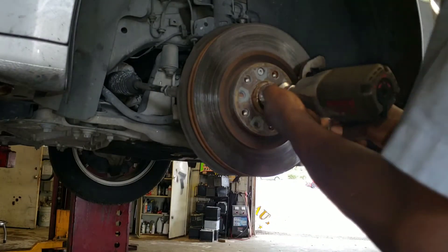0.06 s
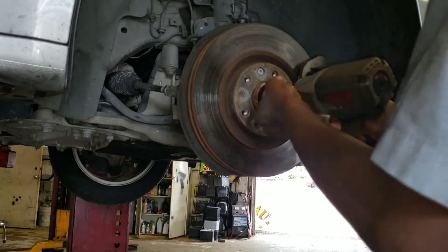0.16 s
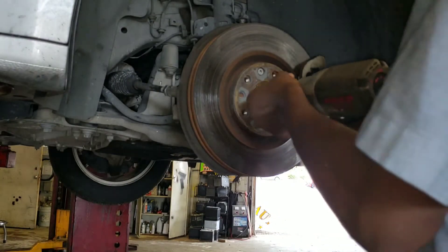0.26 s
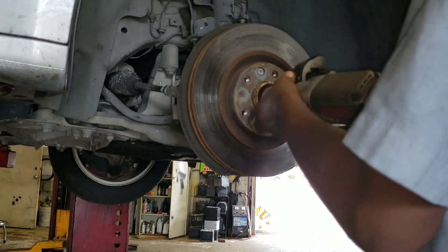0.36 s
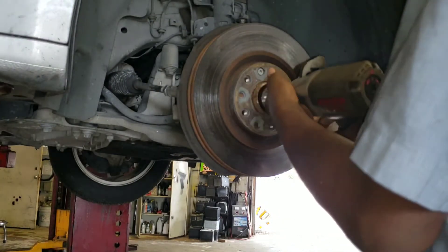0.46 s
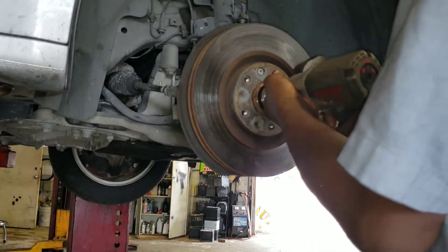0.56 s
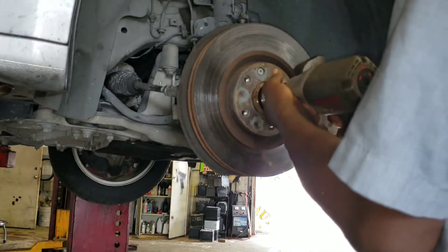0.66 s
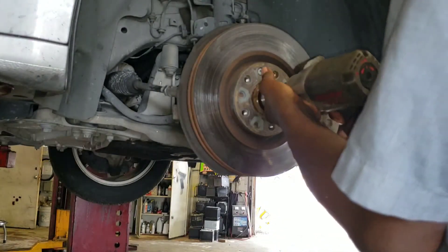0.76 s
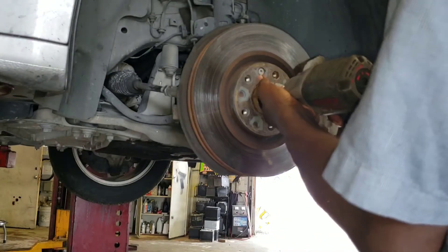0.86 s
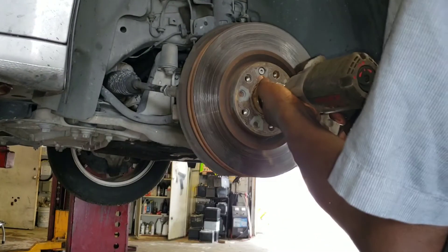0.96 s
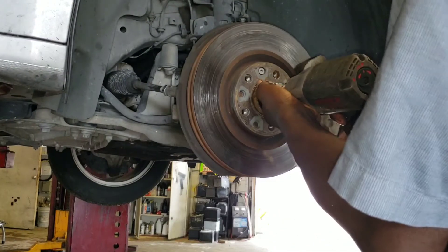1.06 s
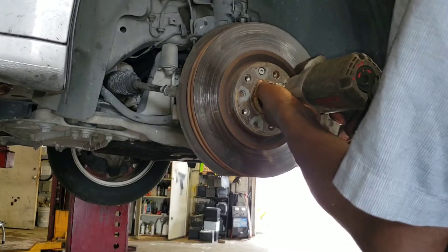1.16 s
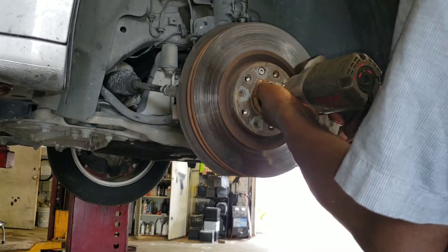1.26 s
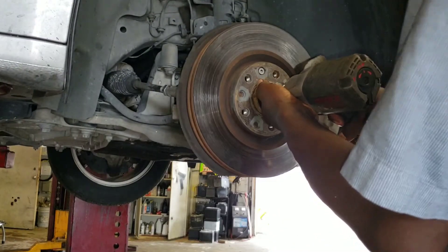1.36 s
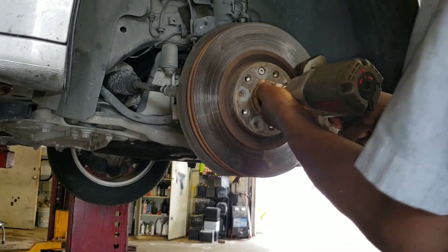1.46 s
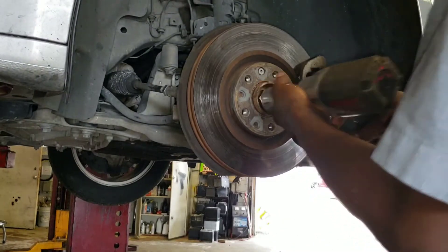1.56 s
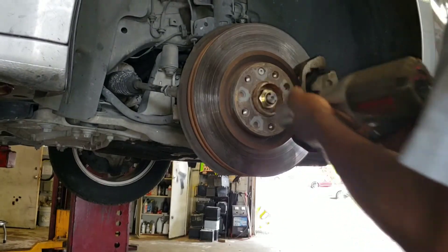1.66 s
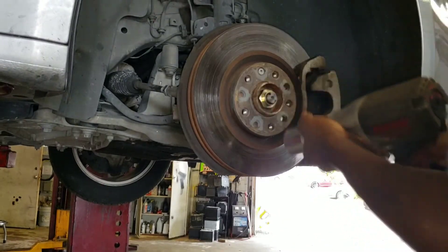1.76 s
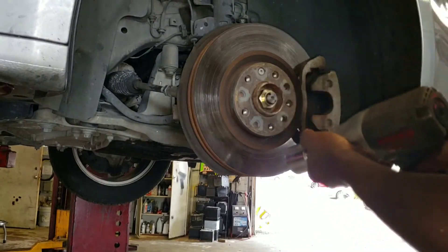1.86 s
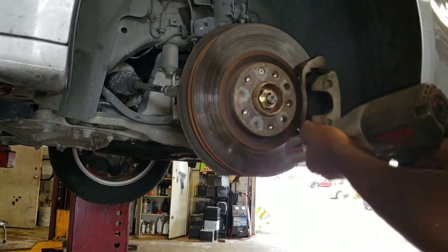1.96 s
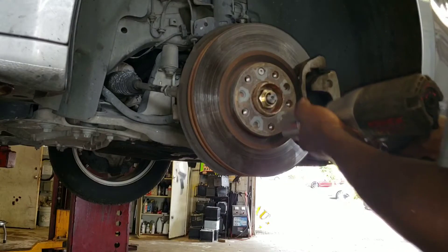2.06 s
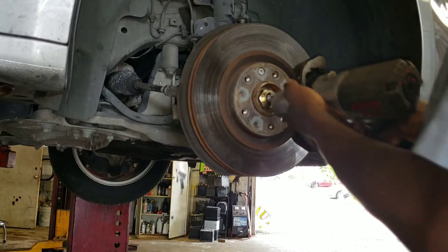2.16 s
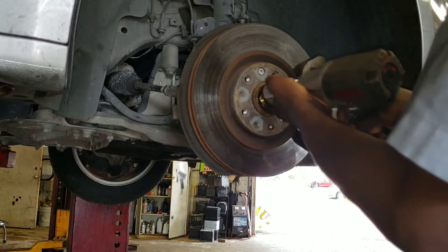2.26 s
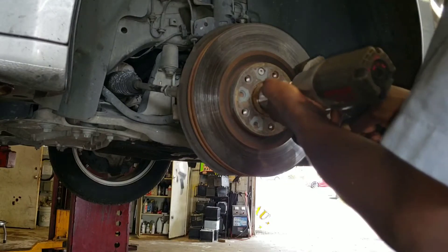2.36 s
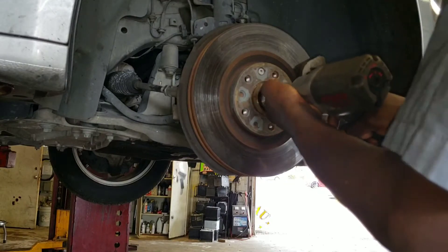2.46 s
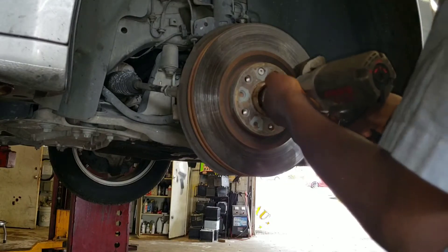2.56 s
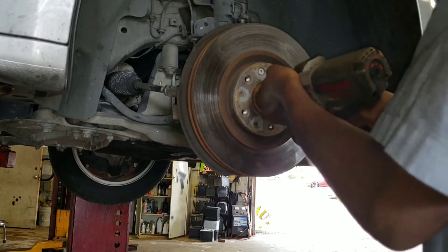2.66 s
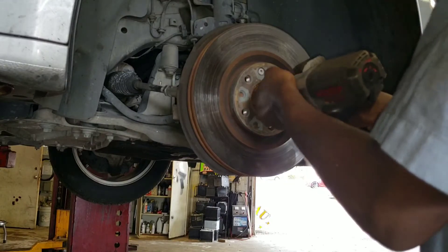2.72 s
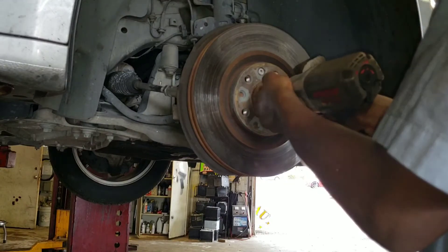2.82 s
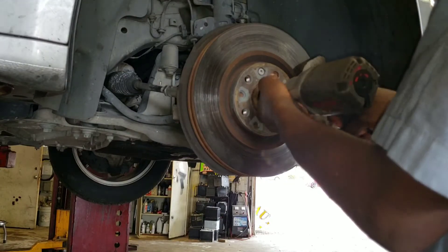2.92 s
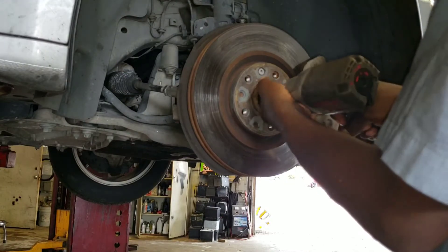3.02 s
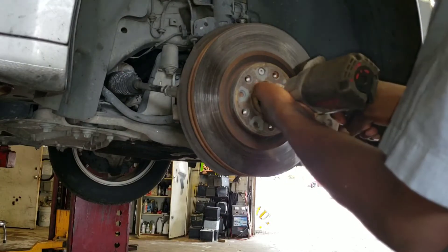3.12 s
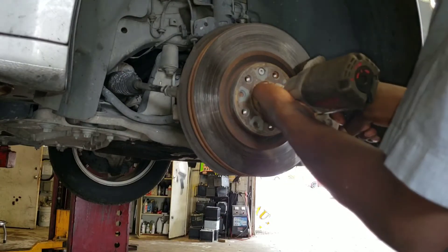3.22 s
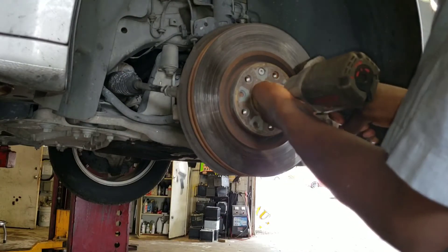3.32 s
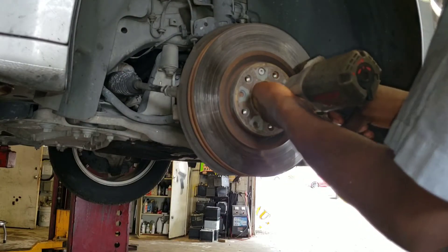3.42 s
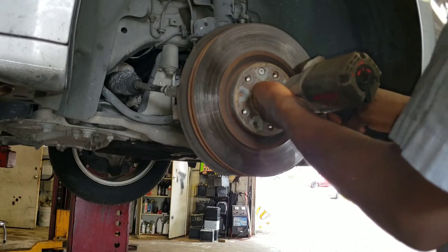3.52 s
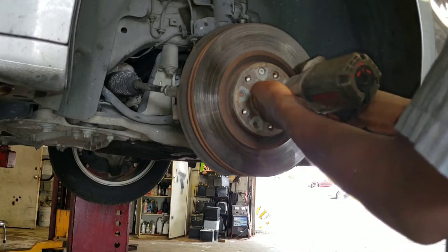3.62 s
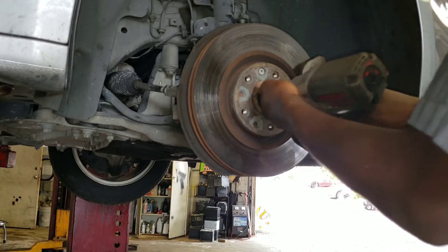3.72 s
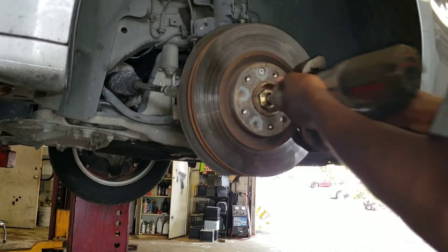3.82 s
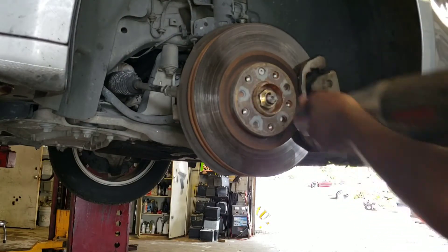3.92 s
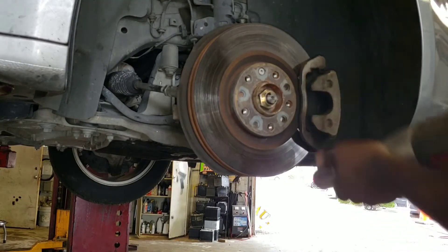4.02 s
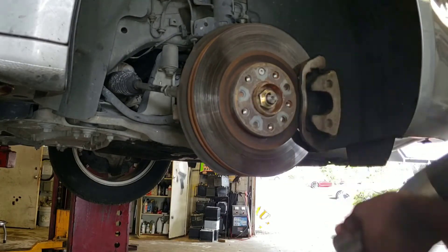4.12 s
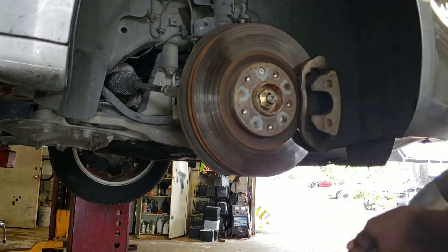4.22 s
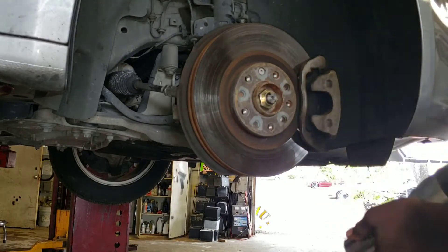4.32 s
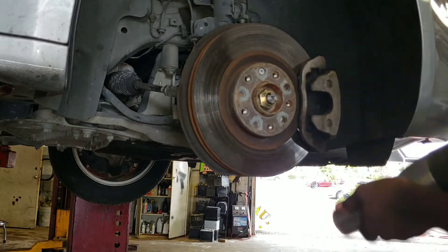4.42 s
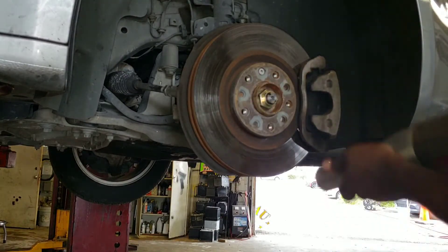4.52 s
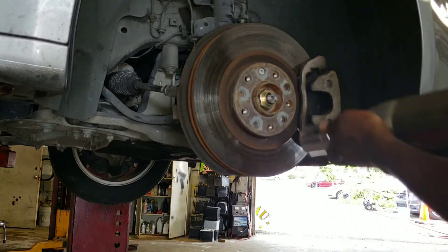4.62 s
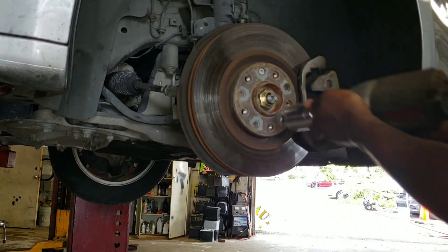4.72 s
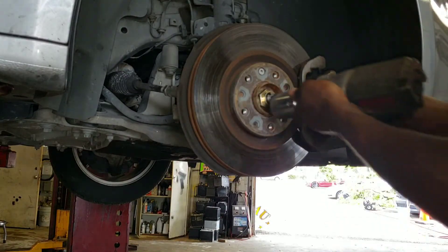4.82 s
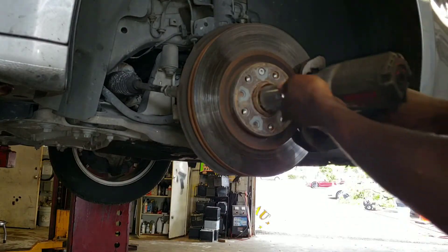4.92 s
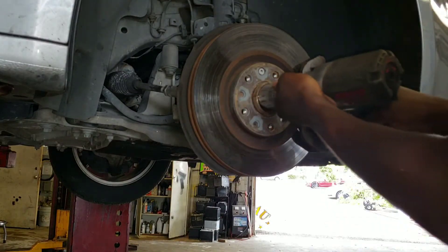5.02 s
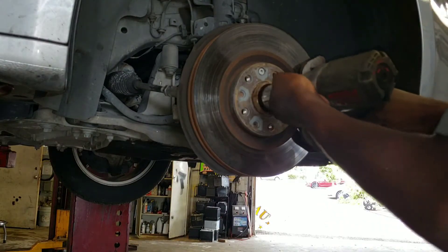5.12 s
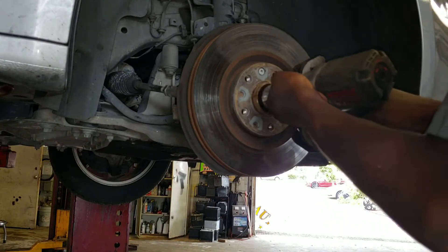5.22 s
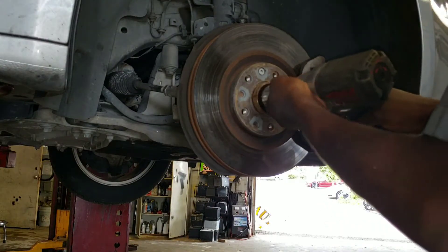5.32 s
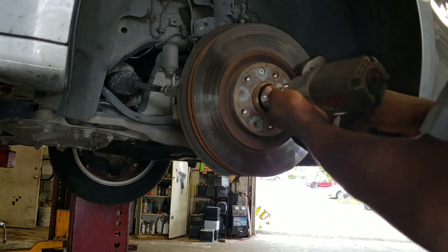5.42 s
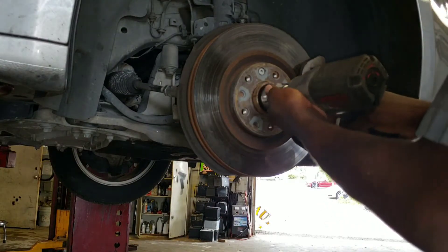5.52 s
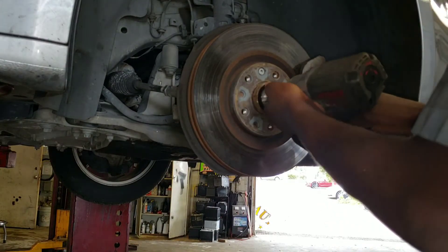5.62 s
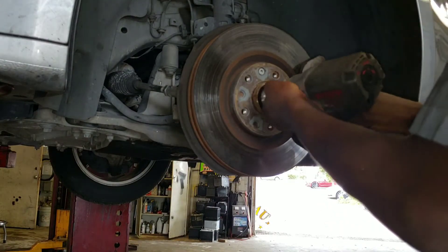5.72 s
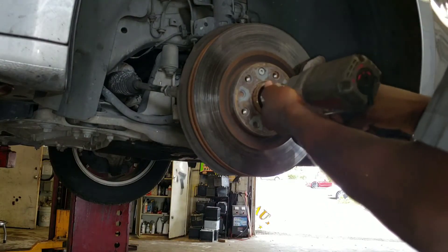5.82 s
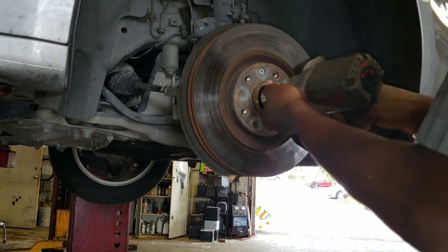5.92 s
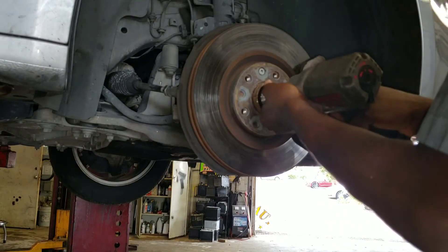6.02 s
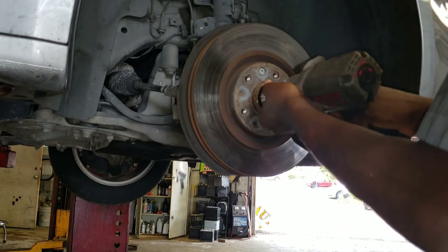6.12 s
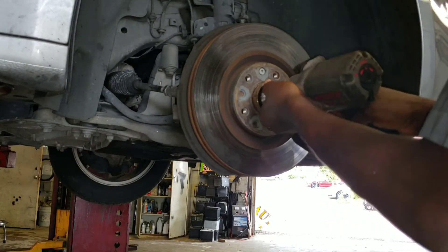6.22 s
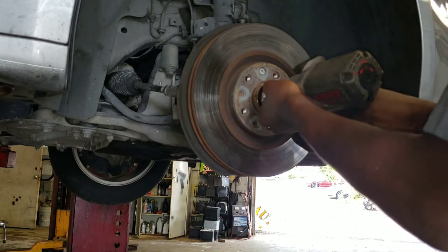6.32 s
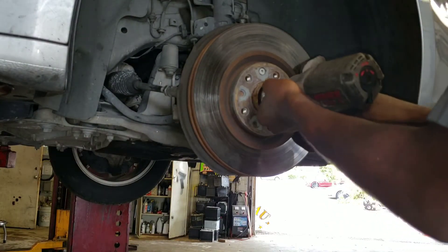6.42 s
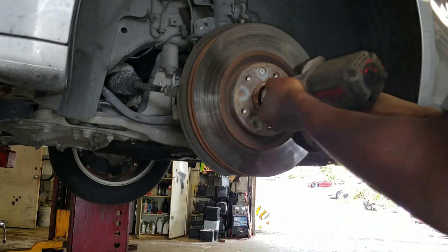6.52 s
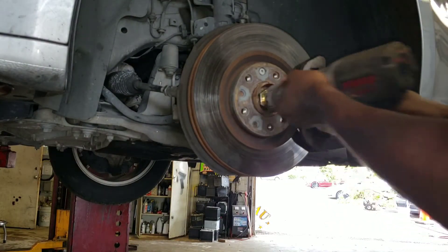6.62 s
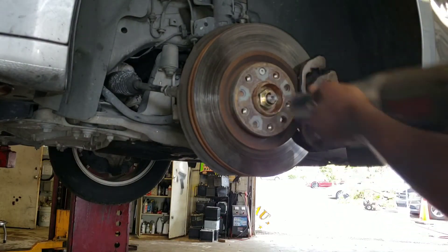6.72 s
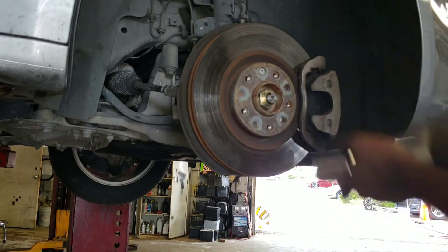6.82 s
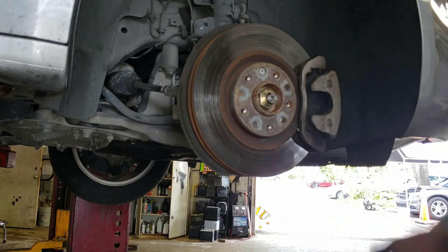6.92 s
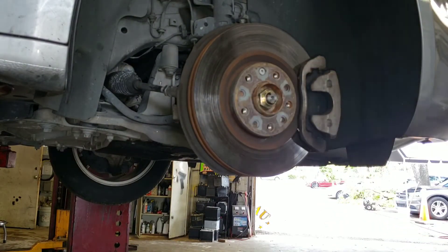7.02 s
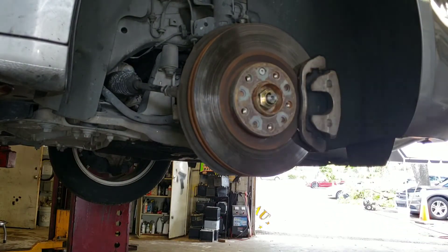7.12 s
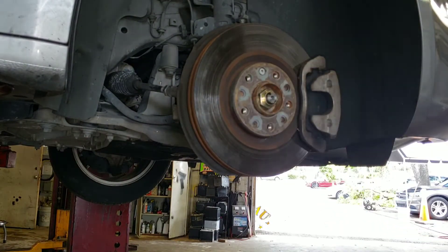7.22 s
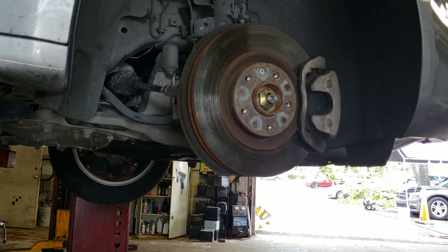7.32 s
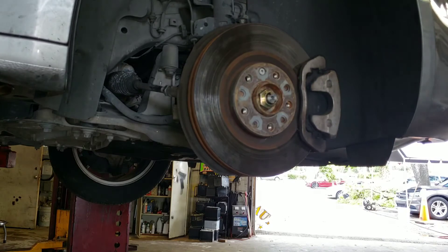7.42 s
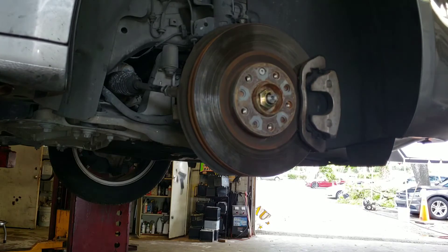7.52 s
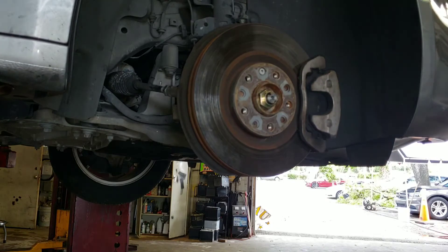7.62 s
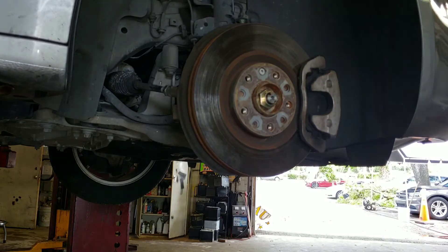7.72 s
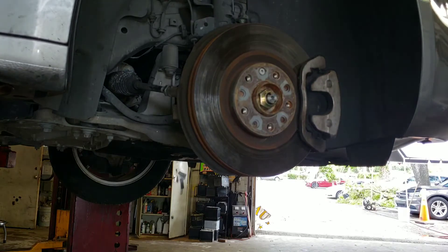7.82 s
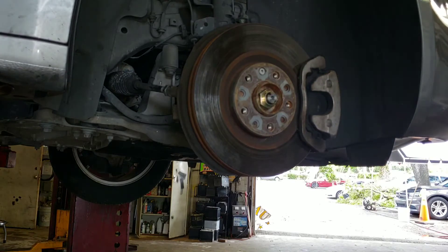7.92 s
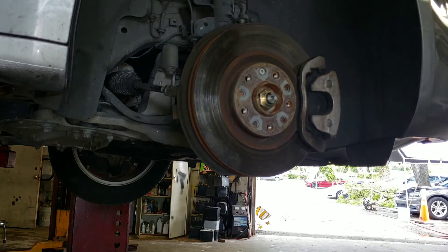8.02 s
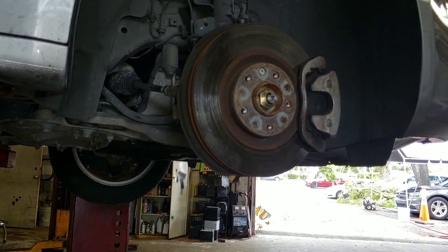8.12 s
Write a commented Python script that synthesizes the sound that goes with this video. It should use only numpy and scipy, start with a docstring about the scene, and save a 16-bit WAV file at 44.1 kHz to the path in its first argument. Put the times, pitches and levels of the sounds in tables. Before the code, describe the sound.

In a garage, three loud pneumatic wrench bursts of rapid metallic blows and rushing air, with small socket clinks and a quiet low pulsing between.

```python
"""Pneumatic impact wrench

Three bursts tighten a hub nut: a modulated jet of air, a vane whine as the nut first runs down, and about 20
blows a second exciting modes of socket, hub and brake disc. Before and between bursts the loose socket
clinks as damped modes. A compressor throbs periodically and air hisses as coloured noise in a garage;
gain control pushes them down at every burst."""
import sys
import numpy as np
from scipy import signal
from scipy.fft import rfft, irfft, next_fast_len
from scipy.io import wavfile
from scipy.ndimage import uniform_filter1d, map_coordinates

SR = 44100
rng = np.random.default_rng(int(sys.argv[2]) if len(sys.argv) > 2 else 0)


def int16_out(signal):
    """Quantize to a 16-bit WAV file."""
    q = np.round(np.clip(np.atleast_2d(signal).T, -1, 1) * 32767)
    wavfile.write(sys.argv[1], SR, q.astype(np.int16))


N = 360320

# Levels within a spectrum or a set of modes are relative; t60_s is the time to fade by 60 dB.

# compressor heard round the walls: freq_hz, level_db
DRONE_SPECTRUM = [(15, -48), (25, -19), (87, -12), (180, -10.5), (244, 0.5), (310, -5.5), (385, 1),
                  (445, -4), (494, -10), (549, -13.5), (657, -21), (730, -18), (900, -46), (1170, -37),
                  (1980, -120)]
# pump and motor tones: freq_hz, level_db (rms)
HUM_TONES = [(44.45, -50), (88.9, -58), (120, -51), (144.4, -45.5)]
# one piston stroke, a double gulp of air and a softer valve note:
# time_in_stroke_s, half_length_s, pitch_hz, level_db
STROKE_NOTES = [(.0357, 0.0026, 270, -16.5), (.0433, 0.0041, 317, -14.5), (0.00834, 0.0057, 435, -31)]
STROKE_S = 0.090008  # period of the piston

# leaking air: freq_hz, level_db
HISS_SPECTRUM = [(500, -25), (730, 1), (850, -6), (1400, -5), (3300, -6), (3800, -2), (4400, -10),
                 (5700, -9.5), (7300, -9), (7950, -0.5), (8700, -9.5), (10000, -10), (12400, -6),
                 (15100, -14), (15700, -33)]
# left-right likeness of the noises: freq_hz, likeness (0 to 1)
LIKENESS = [(200, 1), (1000, 0.97), (2500, 0.32), (6000, 0.06)]
# part of the sound scattered by hand and hub: freq_hz, share_of_power
SCATTER_SHARE = [(2500, 0.03), (6000, 0.13)]
# decay of the room: freq_hz, t60_s
GARAGE_DECAY = [(200, 1), (2000, 0.56), (6000, 0.49), (15000, 0.31)]

# the loose socket touches the nut: start_s, knock_db, ring_db, chatter_s, knock_colour_hz
CLINK_EVENTS = [(0.062, -15.5, -25, 0.008, 3060), (0.258, -11.5, -30, .005, 4270),
                (0.736, -10, 5, 0.00305, 4000), (0.784, -9, -4, 0.007, 2500),
                (2.3405, -4, -12, 0.0012, 1580), (2.372, -10.5, -21, .012, 3000),
                (2.503, -17, -30, .019, 1250), (2.705, -18.5, -31, .025, 2470),
                (2.742, -16.5, -30, 0.021, 1200), (4.970, -16, -27, .005, 1500),
                (4.983, -13, -36, 0.006, 1600), (5.056, -21, -22, 0.0088, 2330),
                (5.069, -16.5, -34, 0.0075, 1310), (5.206, -13, -22, 0.0073, 2450),
                (5.468, -20, -21, 0.023, 2600), (5.856, -1, -22, 0.0041, 2600), (6.611, -6, -1, .016, 3000)]
# contact noise of a knock: freq_hz, level_db
KNOCK_SPECTRUM = [(290, -30), (500, -5), (684, 2), (1000, -1.5), (1930, -8.5), (3510, -4.5), (4800, -14.5),
                  (7790, -5), (15000, -7)]
# socket and nut when knocked: freq_hz, level_db, t60_s
SOCKET_MODES = [(1010, -6, 0.098), (1410, -2, .05), (2800, 4, 0.1), (3630, -2, 0.1), (4360, 4.5, 0.049),
                (5540, 7, 0.027)]
# the socket hanging free: freq_hz, level_db, t60_s
BELL_MODES = [(7940, 8, 0.055), (8050, -1, 0.092)]

# pulls of the trigger: valve_opens_s, valve_closes_s, rise_time_s, sag_time_under_load_s, air_db
TRIGGER_PULLS = [(.693, 1.592, 0.14, 0.033, -5), (2.921, 3.795, 0.026, 0.26, -6),
                 (5.79, 6.605, 0.11, 0.26, -4)]
# outflow of the vane motor: freq_hz, level_db
EXHAUST_SPECTRUM = [(53, -17), (85, -5.5), (130, 0), (288, -3.5), (570, -4), (950, -2.5), (1550, -3.5),
                    (2180, -2.5), (2890, 1), (4080, 0.5), (5750, -3), (6840, -5), (7780, 0), (9700, -6),
                    (11700, 0), (15500, 3.5)]
# sharp puffs and spits of air: freq_hz, level_db
JET_SPECTRUM = [(1000, -28), (7000, -34), (10000, 3), (13500, 16), (15500, -5)]
# the valve spits as it opens: time_s, level_db
VALVE_SPITS = [(.695, -29), (.709, -17.5), (2.937, -7), (5.81, -17.5)]
# the motor runs the loose nut down: time_s, vane_rate_hz, level_db
RUN_DOWN_CURVE = [(.735, 288.7, -43), (0.765, 309, -28), (.835, 323, -18), (.905, 315.5, -16),
                  (.935, 266, -42)]
# partials of the vane whine: multiple, level_db
VANE_PARTIALS = [(1, -8), (2, -28), (3, -12), (4, 0), (5, -5), (9, -7)]

# hammer blows, slowing as the nut tightens: time_s, level_db over the usual blow of that pull
BLOW_EVENTS = [(.9075, 0.5), (.9466, 0), (.9883, 0), (1.0319, -1), (1.0754, -1.5), (1.1206, 0), (1.1635, 2),
               (1.2072, -5), (1.2562, 2), (1.2996, -0.5), (1.3442, -2.5), (1.3934, 2.5), (1.4372, -1.5),
               (1.4907, 3.5), (1.5349, 0.5), (1.5815, .5), (2.9559, -3), (3.0024, 0), (3.0443, 1),
               (3.0887, -2.5), (3.1338, 0), (3.1795, -0.5), (3.224, -1), (3.2688, -1), (3.3142, 0),
               (3.3626, 1), (3.4077, -1.5), (3.4564, -0.5), (3.5025, 1), (3.5479, -2.5), (3.5934, -3),
               (3.6398, 0), (3.6854, -0.5), (3.7326, 0), (3.7781, 0), (3.841, -6), (5.8459, -3),
               (5.8981, -2.5), (5.9465, -0.5), (5.9975, 0), (6.0489, 1.5), (6.1037, -0.5), (6.158, 0.5),
               (6.2126, 0.5), (6.2647, 0.5), (6.3179, 0), (6.3742, 1), (6.4305, 2.5), (6.4868, 1),
               (6.5428, 3), (6.5983, -2)]
# how each pull seats the socket: time_to_seat_s, blow_db, then relative to the blow: rebound_db,
# clang_db, hub_db; crack_middle_db; narrowing of the clang to one note (db_per_octave)
PULL_SEATING = [(0.13, -7.5, -36, -11.5, -29, 1, 80), (0.15, -5, -15.5, -11.5, -26.5, 4.5, 4),
                (0.29, -4, -18, -17, -21, 4, 2)]
# contact noise of a blow: freq_hz, level_db
CRACK_SPECTRUM = [(180, -69), (300, -21.5), (1300, -7.5), (1700, -6), (2300, 0), (4210, -5), (4720, -8),
                  (5480, -4.5), (6460, -7.5), (7950, -1), (9760, -10), (12900, -2.5), (15500, -14)]
# the band of the crack that depends on the seating: freq_hz, share
CRACK_MIDDLE_SHARE = [(1000, 0.18), (1700, 0.96), (2600, 0.41), (4500, 0.3)]
# anvil and socket: freq_hz, level_db
STEEL_MODES = [(2083, -40.5), (2256, -44.5), (2433, -38.5), (2632, -57), (2785, -39.5), (3144, -45),
               (3575, -42.5), (4150, -37), (5480, -44), (5970, -39.5), (7900, -36)]
# the socket's wall: freq_hz, level_db, t60_s
CLANG_MODES = [(2000, -6, 0.14), (2200, -3, 0.15), (2258, -3, 0.33), (2434, 0.5, 0.15), (2500, 3, 0.098)]
# hub and knuckle: freq_hz, level_db
HUB_MODES = [(655, 1.5), (685, 2.5), (856, 2.5), (915, 5), (964, 6.5), (1025, -5.5), (1118, 4), (1200, 4)]
# brake disc, borne on at another place by each pull:
# freq_hz, t60_s, first_pull_db, second_pull_db, third_pull_db (relative to the blow)
DISC_MODES = [(663, 0.6, -39, -40, -38), (1265, 0.41, -60, -58, -35.5), (1311, 0.63, -58, -48, -37),
              (2040, .27, -38, -46, -31), (2920, 0.51, -49, -34.5, -39), (3180, 0.38, -43, -48, -35),
              (3670, 0.58, -48, -49, -40)]

# the socket rubs on the nut and one resonance sings: middle_s, half_length_s, pitch_hz, width_hz, level_db
SCRAPE_EVENTS = [(2.375, 0.0031, 8030, 130, -12), (2.387, 0.032, 3610, 220, -26.5),
                 (2.721, 0.0056, 2430, 400, -24.5), (5.034, 0.008, 2550, 302, -25.5),
                 (5.058, 0.015, 7900, 70, -26.5), (5.484, 0.014, 3200, 700, -27)]


def amp(db):
    """Level law: decibels to amplitude ratio."""
    return 10 ** (np.asarray(db) / 20)


def unit(x):
    """Normalisation to rms 1."""
    return x / np.sqrt(np.mean(x ** 2) + 1e-20)


def seconds(size):
    """Sampling: the time of each sample."""
    return np.arange(size) / SR


def along(points, hz):
    """Interpolation of (Hz, value) points on a logarithmic frequency axis."""
    f, v = np.transpose(points)
    return np.interp(np.log(hz + 1), np.log(f + 1), v)


def wobble(rate):
    """Slow random modulation: a smooth curve through rate random knots a second."""
    return map_coordinates(rng.standard_normal(1024), [seconds(N) * rate], mode="wrap")


def noise(spectrum, alike, size):
    """Coloured stereo noise of rms 1: the balance of mid and side sets the left-right coherence."""
    m = next_fast_len(size)
    hz = np.fft.rfftfreq(m, 1 / SR)
    turn = np.arccos(np.clip(along(alike, hz), -1, 1)) / 2
    white = rfft(rng.standard_normal((2, m)))
    coloured = white * amp(along(spectrum, hz)) * [np.cos(turn), np.sin(turn)]
    mid, side = irfft(coloured, m)[:, :size]
    return unit(np.array([mid + side, mid - side]))


def ring(modes, t, spread, vary_db=3.0):
    """Modal decay of (Hz, dB, t60 s) partials, the strongest set to 0 dB before random variation."""
    hz, db, t60 = np.transpose(modes)[:, :, None]
    strength, phase, skew = rng.standard_normal((3, len(hz)))
    # each mode meets the two microphones at another phase
    stereo_phase = 2 * np.pi * phase + np.outer([1, -1], spread * skew)
    weight = amp(vary_db * strength) * np.exp(1j * stereo_phase)
    rise = 1 - np.exp(-hz * t)  # each mode builds up within about a cycle
    partials = amp(db - db.max()) * rise * np.exp((2j * np.pi * hz - np.log(1000) / t60) * t)
    return (weight @ partials).imag


def add(track, s, sound):
    """Superposition: mix a sound into a track at time s."""
    part = track[:, max(round(s * SR), 0):][:, :sound.shape[-1]]
    part += sound[..., :part.shape[-1]]


def compressor(glide_hz_per_s=9000, waver=0.032, echo_db=-31.0, rumble_db=-35):
    """Periodic excitation: each stroke gulps air in rising notes; the walls return the same drone every stroke."""
    t = seconds(N)
    gulps = np.zeros(N)
    for s, half_s, hz, db in STROKE_NOTES:
        u = (t - s + STROKE_S / 2) % STROKE_S - STROKE_S / 2  # time from the note's middle
        turn = 2 * np.pi * u * (hz * (1 + waver * wobble(10)) + glide_hz_per_s * u / 2)
        gulps += amp(db + 1.26 * wobble(10)) * np.exp(-(u / half_s) ** 2) * np.cos(turn)
    size = round(STROKE_S * SR)
    place = (t % STROKE_S * SR).astype(int) % size
    echo = noise(DRONE_SPECTRUM, [(100, 1.0), (600, 0.6)], size)[:, place]
    hum = sum(amp(db) * np.sqrt(2) * np.sin(2 * np.pi * (hz * t + rng.random())) for hz, db in HUM_TONES)
    rumble = noise(DRONE_SPECTRUM, [(100, 0.92), (600, 0.29)], N)
    return gulps + amp(echo_db) * echo + amp(rumble_db) * rumble + hum


def air_leak(hiss_db=-33.5, lag_s=0.00043):
    """Interaural delay: a nearly steady hiss from the left reaches the right microphone later."""
    left = noise(HISS_SPECTRUM, [(1000, 0.42)], N)[0]
    direct = np.array([left, np.roll(left, round(lag_s * SR))])
    reflected = wheel_well(noise(HISS_SPECTRUM, [(700, 0.0), (3000, 0.042)], N))
    return amp(hiss_db + 0.33 * wobble(6.0)) * (direct + reflected)


def wheel_well(x, count=9, earliest_s=0.0004, latest_s=0.004, echo_db=-17.5, skew_s=0.00026, scatter_s=0.0052):
    """Early reflection: disc and wheel well return quick echoes and scatter treble differently to each side."""
    echoes = np.zeros((2, SR // 50))
    delays = rng.uniform(earliest_s, latest_s, count)
    skews = rng.uniform(-skew_s, skew_s, count)
    signs = rng.choice([-1, 1], count)
    for side, arrivals in zip(echoes, [delays - skews, delays + skews]):
        side[np.clip(arrivals * SR, 1, len(side) - 1).astype(int)] = signs
    echoes *= amp(echo_db) / np.sqrt(count)
    echoes[:, 0] = 1  # direct sound
    scatter = rng.standard_normal(echoes.shape) * np.exp(-seconds(SR // 50) / scatter_s)
    m = next_fast_len(N + SR // 2)
    share = np.clip(along(SCATTER_SHARE, np.fft.rfftfreq(m, 1 / SR)), 0, 1)
    near, scattered = (rfft(h / np.linalg.norm(h, axis=1, keepdims=True), m) for h in (echoes, scatter))
    response = np.sqrt(1 - share) * near + np.sqrt(share) * scattered
    return irfft(rfft(x, m) * response, m)[:, :N]


def clinks(knock_t60=0.0073, rattle_db=-13, rattle_t60=0.16, socket_db=-10, damp_s=0.0052,
           colour_db_per_octave=9.5, ring_gain_db=-4, bounce=0.86, count=6):
    """Repeated impact: the socket chatters on the nut in quick touches and, while it hangs free, rings high."""
    out, t = np.zeros((2, N)), seconds(SR // 5)
    for s, knock_db, ring_db, chatter_s, colour_hz in CLINK_EVENTS:
        # each contact point favours its own band
        colour = [(hz, db - colour_db_per_octave * abs(np.log2(hz / colour_hz))) for hz, db in KNOCK_SPECTRUM]
        delays = np.sort(rng.random(count))
        sizes = bounce ** np.arange(count)
        for delay, size in zip(delays - delays[0], sizes / np.linalg.norm(sizes)):
            fade = amp(-60 * t / knock_t60) + amp(rattle_db - 60 * t / rattle_t60)
            knock = fade * noise(colour, LIKENESS, len(t))
            ringing = np.exp(-chatter_s / damp_s)  # only a clean knock lets it ring
            clank = amp(socket_db) * ringing * ring(SOCKET_MODES, t, spread=0.46)
            bell = amp(ring_db + ring_gain_db) * ring(BELL_MODES, t, spread=0.19)
            add(out, s + chatter_s * delay, size * (amp(knock_db) * (knock + clank) + bell))
    return out


def garage(x):
    """Reverberation: convolution with decaying noise whose treble dies first."""
    hz, t, z = signal.stft(rng.standard_normal((2, SR // 2)), SR, nperseg=256)
    fade = amp(-60 * t / along(GARAGE_DECAY, hz)[:, None])
    tail = signal.istft(z * fade, SR, nperseg=256)[1]
    return signal.fftconvolve(x, tail / np.linalg.norm(tail[0]), axes=1)[:, :N]


def blows(pull, late_s=0.1):
    """Inertia: the blows of one pull; the motor may coast into a last one after the valve closes."""
    opens_s, closes_s = TRIGGER_PULLS[pull][:2]
    return np.array([row for row in BLOW_EVENTS if opens_s < row[0] < closes_s + late_s])


def exhaust(surge_db=7.5, release_s=0.037, spit_s=0.0052,
            flutter_db=2.0, puff_db=-3.0, puff_phase=0.565, puff_s=0.0031):
    """Jet noise: the vane motor's air flutters, with a sharp puff as it picks up speed between blows."""
    t = seconds(N)
    flow, puffs = np.zeros((2, N))
    for pull, (open_s, close_s, rise_s, sag_s, air_db) in enumerate(TRIGGER_PULLS):
        times = blows(pull)[:, 0]
        opening = 1 - np.exp(-np.maximum(t - open_s, 0) / rise_s)
        closing = np.exp(-(np.maximum(t - close_s, 0) / release_s) ** 2)
        load = np.maximum(t - times[0], 0) / sag_s
        flow += opening * closing * amp(air_db + surge_db * np.exp(-load))  # more air while running free
        puff_times = times[:-1] + puff_phase * np.diff(times)
        puffs += sum(np.exp(-((t - s) / puff_s) ** 2) for s in puff_times)
    spits = sum(amp(db) * np.exp(-((t - s) / spit_s) ** 2) for s, db in VALVE_SPITS)
    flow = flow * amp(flutter_db * wobble(90))
    jet = (amp(puff_db) * flow * puffs + spits) * noise(JET_SPECTRUM, LIKENESS, N)
    return flow * noise(EXHAUST_SPECTRUM, LIKENESS, N) + jet


def run_down(waver=0.0207):
    """Siren principle: the vanes chop the air into a wavering whine while the nut still turns freely."""
    s, vane_hz, db = np.transpose(RUN_DOWN_CURVE)
    t = seconds(N)
    rate_hz = np.interp(t, s, vane_hz) * (1 + waver * wobble(70))
    turn = 2 * np.pi * np.cumsum(rate_hz) / SR
    level = amp(np.interp(t, s, db, left=-120, right=-120))
    return level * sum(amp(part_db + 2 * wobble(50.4)) * np.sin(k * turn) for k, part_db in VANE_PARTIALS)


def contact(t, slack, metal, colour, slack_db=8, attack_s=0.00074, crack_t60=0.01,
            clatter_db=-9, tight_clatter_t60=0.062, same=0.19):
    """Impact noise: a short crack and a clatter that lasts longer in a slack socket."""
    crack = amp(-60 * t / crack_t60)
    clatter = amp(clatter_db - 60 * t / (tight_clatter_t60 * (1 + 3.3 * slack)))
    # a share of the noise repeats from blow to blow
    grain = np.sqrt(same) * metal + np.sqrt(1 - same) * noise(colour, LIKENESS, len(t))
    return amp(-slack_db * slack) * (crack + clatter) * (1 - np.exp(-t / attack_s)) * grain


def hammer(blow_db=18.0, soft_db=2.0, steel_db=-22.5, hub_t60=0.12, hub_rise_s=0.0044,
           rebound_t60=0.064, rebound_s=0.0083, rebound_fade_s=0.19, tight_db=-8, tight_s=0.72,
           swell_s=0.0029, bite=0.55, clang_hz=2240, free_db=8):
    """Modal impact: each blow is contact noise, ringing metal and a rebound; blows harden as the nut seats."""
    out, t = np.zeros((2, N)), seconds(SR // 7)
    swell = 1 - np.exp(-t / swell_s)  # the socket's wall takes a moment to sound
    hub_modes = [(hz, mode_db, hub_t60) for hz, mode_db in HUB_MODES]
    rebound_modes = [(hz, mode_db, rebound_t60) for hz, mode_db in HUB_MODES]
    for pull, (seat_s, db, rebound_db, clang_db, hub_db, middle_db, narrow_db) in enumerate(PULL_SEATING):
        wall = [(hz, level - narrow_db * abs(np.log2(hz / clang_hz)), t60) for hz, level, t60 in CLANG_MODES]
        disc_modes = [(hz, levels[pull], t60) for hz, t60, *levels in DISC_MODES]
        disc_db = max(level for hz, level, t60 in disc_modes)
        metal = noise(CRACK_SPECTRUM, LIKENESS, len(t))
        last_s = blows(pull)[-1, 0]
        for s, extra_db in blows(pull):
            age = s - TRIGGER_PULLS[pull][0]
            slack = np.exp(-age / seat_s)
            bark_db = middle_db + bite * extra_db  # hard blows bark more
            colour = [(hz, level + bark_db * along(CRACK_MIDDLE_SHARE, hz)) for hz, level in CRACK_SPECTRUM]
            strike = contact(t, slack, metal, colour)
            grip = 1 + 0.0028 * rng.standard_normal()  # the socket sits a little differently at every blow
            # 0.16 s decay at 2200 Hz, shorter above
            steel_modes = [(hz * grip, mode_db, 0.16 * (2200 / hz) ** 0.46) for hz, mode_db in STEEL_MODES]
            steel = amp(steel_db) * ring(steel_modes, t, spread=0.67)
            muted_db = tight_db * (2.5 - np.exp(-age / tight_s))  # muted as it tightens
            clang = amp(clang_db + muted_db) * ring(wall, t, spread=0.22)
            hub = amp(hub_db) * (1 - np.exp(-t / hub_rise_s)) * ring(hub_modes, t, spread=0.2)
            # the hub knocks back, less as the nut tightens
            rebound = amp(rebound_db) * np.exp(-age / rebound_fade_s) * ring(rebound_modes, t, spread=0.16)
            # the disc rings louder on the last blow, as the hand eases off
            disc_gain = amp(disc_db + free_db * (s == last_s))
            disc = disc_gain * ring(disc_modes, seconds(SR // 2), spread=0.98)
            strength = amp(blow_db + db + extra_db - soft_db * slack)
            add(out, s, strength * (strike + steel + swell * clang + hub))
            add(out, s + rebound_s, strength * swell * rebound)
            add(out, s, strength * disc)
    return out


def scrapes():
    """Friction excitation: short rubs swell and fade in one resonance of the socket."""
    out, t = np.zeros((2, N)), seconds(SR // 5)
    u = t - t.mean()
    skirt = [(-8, -90), (-2, -18), (0, 0), (2, -18), (8, -90)]  # (widths off the pitch, dB)
    for s, half_s, hz, width_hz, db in SCRAPE_EVENTS:
        band = [(hz * np.exp(k * width_hz / hz), level) for k, level in skirt]
        add(out, s - t.mean(), amp(db) * np.exp(-(u / half_s) ** 2) * noise(band, LIKENESS, len(t)))
    return out


def scene():
    """Superposition: the wrench in wheel well and garage, over the hiss and the compressor."""
    wrench = wheel_well(exhaust() + run_down() + hammer() + clinks() + scrapes())
    balance = amp([[0.4], [-0.4]])  # slightly to the left
    return (wrench + amp(-11.5) * garage(wrench) + air_leak()) * balance + compressor()


def gain_cut(excess_db, depth_db, hold, attack, release, step):
    """Compression with memory: the cut follows the excess level, holds, then lets go (times in s)."""
    cut, wanted = [0], np.clip(excess_db, 0, depth_db)
    for k in range(len(wanted)):
        goal = wanted[max(k - round(hold / step), 0):k + 1].max()
        lag = attack if goal > cut[-1] else release
        cut.append(goal + (cut[-1] - goal) * np.exp(-step / lag))
    return np.array(cut[1:])


def record(dry, threshold_db=-18, size=256, top_hz=15650):
    """Automatic gain control: a quick and a slow stage turn loud sound down, then a sharp low-pass limits it."""
    power = np.abs(uniform_filter1d(np.mean(dry ** 2, axis=0), 8 * size))[::size]
    excess_db = 10 * np.log10(power + 1e-12) - threshold_db
    quick = gain_cut(excess_db, depth_db=8.5, hold=0.0067, attack=0.025, release=0.27, step=size / SR)
    slow = gain_cut(excess_db, depth_db=11.5, hold=1.003, attack=0.19, release=0.26, step=size / SR)
    levelled = dry * amp(-np.interp(np.arange(N), np.arange(0, N, size), quick + slow))
    m = next_fast_len(N + SR // 2)
    passed = np.fft.rfftfreq(m, 1 / SR) < top_hz
    return np.clip(irfft(rfft(levelled, m) * passed, m)[:, :N], -1, 1)


dry = scene()
out = record(dry)
int16_out(out)
```